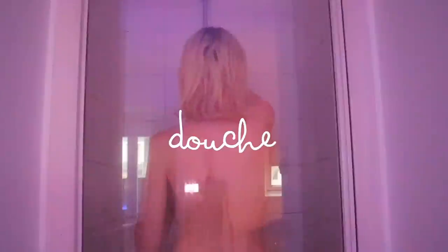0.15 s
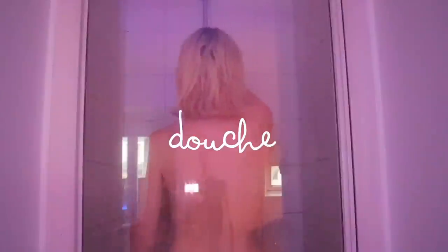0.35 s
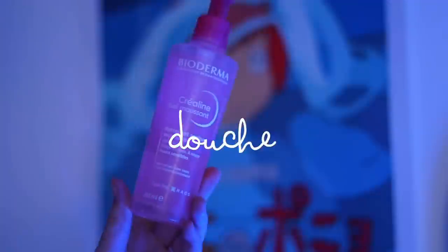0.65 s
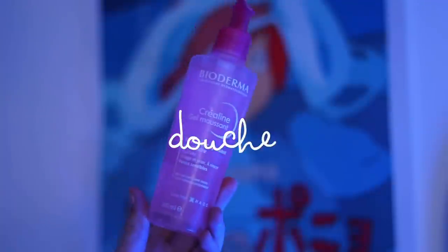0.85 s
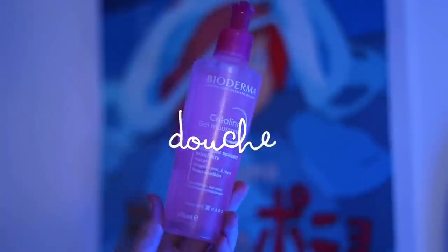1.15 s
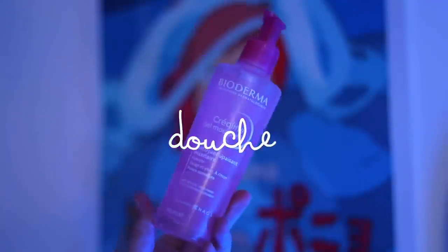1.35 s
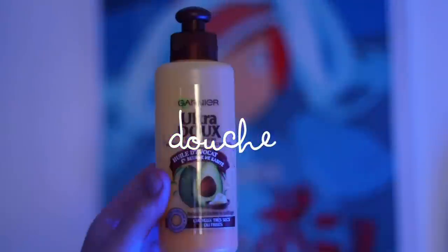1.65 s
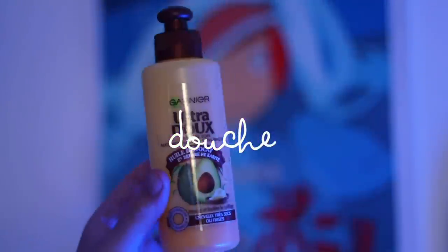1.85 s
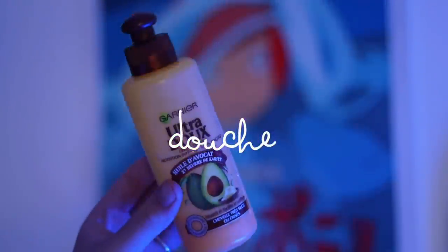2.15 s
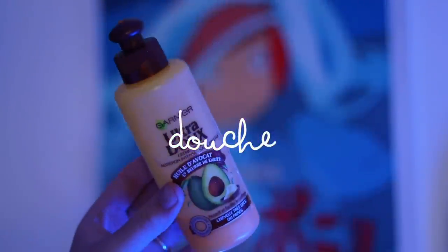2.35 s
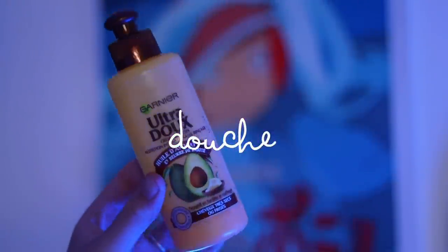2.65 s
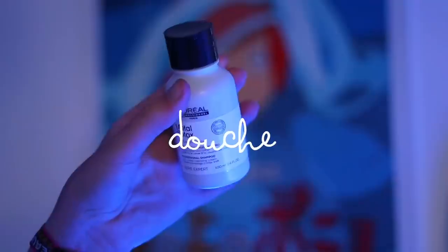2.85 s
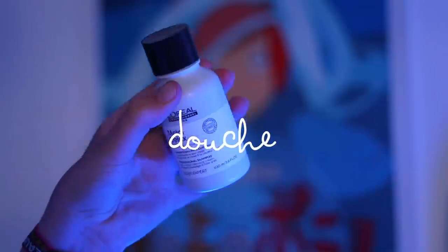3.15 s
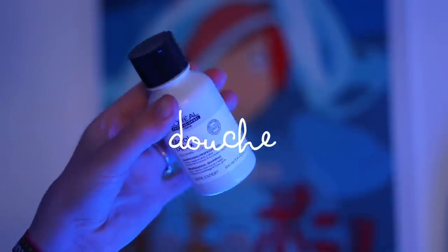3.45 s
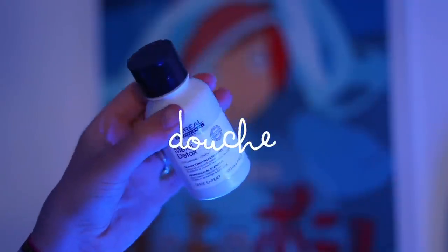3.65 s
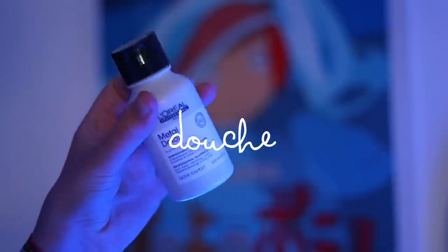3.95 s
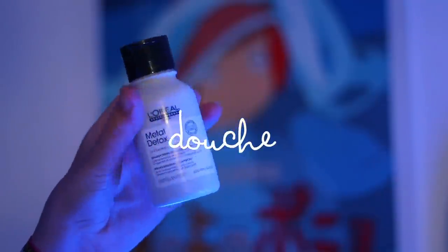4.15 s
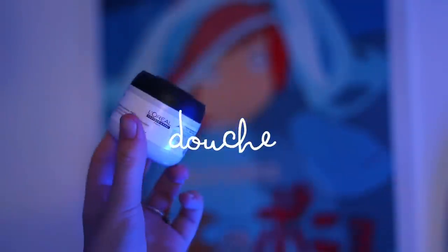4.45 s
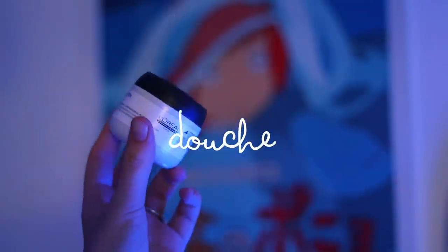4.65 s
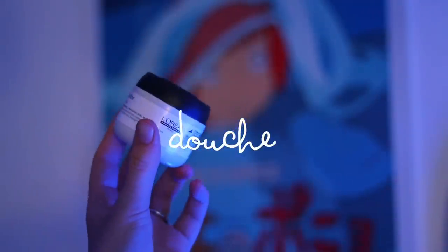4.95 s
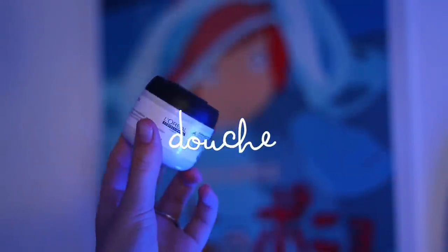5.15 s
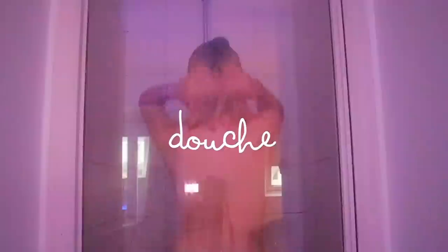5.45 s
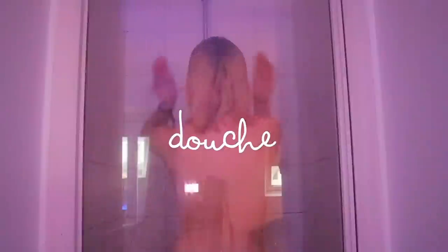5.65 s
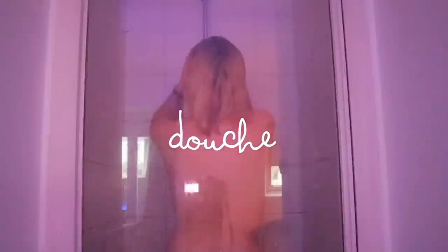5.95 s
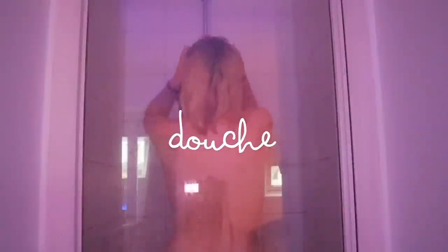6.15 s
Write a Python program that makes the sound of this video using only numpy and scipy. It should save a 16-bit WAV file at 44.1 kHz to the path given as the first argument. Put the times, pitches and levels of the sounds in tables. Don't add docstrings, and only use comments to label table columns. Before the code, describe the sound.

A running shower heard from just outside its cubicle in a small tiled bathroom. Fine, bright spray hisses without stopping while water runs off a body and slaps the tray in uneven bursts, busiest in the first three and a half seconds. Stray drops tick, an occasional bubble plops, and the tray drums softly low down. Wide stereo treble, centred lows, short hard echoes.

```python
import sys
import numpy as np
from scipy import signal
from scipy.fft import rfft, irfft, next_fast_len
from scipy.io import wavfile
from scipy.ndimage import uniform_filter1d

SR = 44100
rng = np.random.default_rng(int(sys.argv[2]) if len(sys.argv) > 2 else 0)


def undo_db(level):
    steps = np.asarray(level, float) / 20
    return 10 ** steps


def int16_out(signal):
    q = np.round(np.clip(np.atleast_2d(signal).T, -1, 1) * 32767)
    wavfile.write(sys.argv[1], SR, q.astype(np.int16))


N = 277389

# start_s, stream_db, coarseness_db, weight_db
STREAM = [(0, -6, -6.5, -2), (.3, -1, -3, -4), (.6, 1, 3, 0), (1.0, -0.5, 1.1, 1), (1.3, -0.5, -2, -1.4),
          (1.75, -4, 5.5, -2.5), (1.96, -0.5, 1, -3), (2.4, -0.5, -2, 1), (2.75, 0, 5, 2.5),
          (3.01, 0, 2.5, 3.5), (3.52, -4, 9.5, 0.5), (3.61, -5, -1, 0.5), (3.8, 1.6, 2, 2.5),
          (4.3, -4.5, -1, 1.5), (4.69, 1, -5, -0.2), (5.01, -1, 0.6, 3), (5.3, 0.5, -4, 0.8),
          (6.29, -0.5, -6, 0)]
# crest_s, swell_db, half_length_s, coarseness_db
GUSHES = [(.14, 8.5, 0.044, .1), (1.193, -0.7, 0.064, 0.5), (1.362, 3.5, 0.029, 6.5),
          (1.464, 6, 0.047, 4.5), (2.182, 6.5, 0.061, 2), (2.507, 7, 0.049, 5), (3.214, 8.5, 0.029, 4),
          (3.35, 5.5, 0.06, -3), (5.477, 3, 0.041, 1.5), (5.613, 0.3, .05, -3), (5.714, 0.8, 0.036, 4),
          (5.802, 0.3, .05, 1), (5.888, 4.5, 0.022, 3), (6.166, 1.5, .04, 2)]
# start_s, level_db
OPENING = [
    (0, -1),
    (.06, -0.5),
    (.074, 0),
    (.09, -2),
    (.2, 2),
]
# pitch_hz, level_db (per Hz)
SPRAY_COLOUR = [(300, -37), (700, -7), (1200, -5), (2100, -3.5), (3000, -3), (5000, -3.5), (8000, -2),
                (11000, 0), (12500, -2.5), (13500, -16), (15200, -12)]
# start_s, level_db, centre_hz, width_octaves
SHEETS = [(0.076, -19, 10800, 1.04), (0.15, -17.5, 6030, 0.74), (0.736, -27, 6540, 0.24),
          (1.146, -17.5, 5240, 1), (1.192, -21, 5700, 0.86), (1.389, -16, 6400, 1.1),
          (1.512, -13, 3230, 0.63), (1.718, -16.5, 4940, 0.55), (1.963, -26.5, 3940, 0.59),
          (2.071, -17, 3760, 0.48), (2.531, -23.5, 4950, 0.38), (2.694, -26.5, 7400, .5),
          (2.834, -18.5, 4100, .5), (2.958, -18.5, 5900, 0.64), (3.11, -15.5, 6680, .65),
          (3.233, -11.5, 8150, 0.88), (3.289, -23.5, 3050, 1.2), (3.343, -20, 4870, .99),
          (3.43, -22, 4800, 0.37), (3.494, -23, 4100, .89), (3.83, -13.5, 5200, 1.05),
          (4.577, -24.5, 4930, 0.29), (4.676, -25.5, 7000, 0.58), (4.737, -20.5, 7700, 0.87),
          (5.085, -23.5, 5700, 0.51), (5.344, -23, 8650, 0.47), (5.876, -18.5, 3700, 0.44),
          (6.018, -23.5, 4730, 0.63)]
# start_s, level_db, centre_hz, mist_db (over the body of the splash)
SPLASHES = [(0.097, -20.5, 6400, 9.5), (0.128, -17.5, 6700, 9), (0.236, -19.5, 8500, 5),
            (2.853, -21.5, 8000, -8), (1.246, -19, 7200, -1), (1.305, -19.5, 5530, 3.5),
            (1.428, -20.5, 4500, 5), (1.685, -26.5, 6200, 4), (1.9, -26, 9100, -1), (2.13, -23, 9100, -2),
            (2.182, -16.5, 6940, -1), (2.197, -20, 4300, 4), (2.26, -23.5, 6900, 6), (2.355, -25, 6900, 9),
            (2.463, -21.5, 5660, 3), (2.5, -23, 4200, 4), (2.631, -21.5, 8400, -2),
            (2.782, -23.5, 5300, -2), (3.143, -18, 4770, 5), (3.815, -26, 5400, 12),
            (3.982, -25.5, 6300, 7), (4.123, -28, 4050, 2), (4.342, -28, 5000, 18), (4.426, -18, 6340, 5.5),
            (4.9, -26.5, 5330, -8), (5.248, -27, 6700, 18), (5.431, -25, 8540, 6), (5.721, -26.5, 5800, 13),
            (6.164, -32, 5650, 10)]
# start_s, level_db
PUFFS = [
    (0.428, -32),
    (.881, -31.5),
    (3.657, -31),
    (4.246, -44),
    (4.293, -33),
    (5.04, -31),
    (5.17, -28),
    (5.38, -30),
    (6.22, -37),
]
# start_s, level_db, pitch_hz, t60_s
PLOPS = [(1.44, -33, 418, 0.088), (2.505, -33, 444, 0.074), (1.975, -22.5, 2990, 0.023),
         (2.76, -28.5, 2000, 0.018), (4.426, -36, 1127, 0.049), (5.01, -36, 1980, .04),
         (5.13, -33, 2450, .03), (5.622, -26.5, 2410, 0.03), (5.709, -30.5, 1800, 0.0066),
         (6.113, -25.5, 2650, 0.021), (6.268, -29, 720, 0.084)]
# pitch_hz, width_hz, level_db
ROOM_MODES = [(24.8, 6.1, -1), (73.7, 10.5, -3), (142.7, 4.1, 3.5), (218.6, 5.9, 0), (235.5, 8, -3),
              (280, 3.7, 0.5), (383.4, 37, -11.5), (427, 20.7, -2), (455, 44, -7), (545.7, 24.3, -2.5),
              (645, 55, -8), (823, 170, -8)]
# start_s, level_db, half_length_s
BOOMS = [(0.143, -51, 0.086), (1.146, -46.5, 0.23), (1.6, -52, 0.14), (2.03, -47, 0.13), (2.68, -50, 0.21),
         (3.024, -46, .1), (3.233, -42, .07), (3.8, -50.5, 0.34), (4.487, -48, 0.066), (4.808, -53, 0.18),
         (5.183, -43.5, 0.24), (5.476, -42, 0.03), (5.713, -36.5, 0.1), (5.954, -40, .05),
         (6.165, -42, 0.046)]
# pitch_hz, t60_s
TILE_ECHO = [(500, 0.12), (1500, 0.36), (3500, 0.24), (9000, 0.26), (13000, 0.2)]
# pitch_hz, side_over_mid_db
SIDE_OVER_MID = [(60, -22), (110, -19.5), (200, -11.5), (380, -12), (690, -6.5), (1280, -3), (2350, 1),
                 (4340, 4), (8000, 5), (14700, 7)]

PATTER_DB, FIZZ_DB, DRUM_DB = -36, -31.5, -42
GUSH_FALL = 1.7
DRUM_GUSH = 0.71
BOOM_REST_DB = -55
SHEET_LANDING_S, SHEET_RISE_S, SHEET_MIST_DB = 0.0036, 0.0022, -16
MIST_DB_PER_OCTAVE = 6.5
SLOWER_PER_DB = 0.01
SPLASH_LANDING_S, SPLASH_RISE_S, SPLASH_OCTAVES = 0.008, 0.0028, 0.88
PUFF_HZ, PUFF_OCTAVES, PUFF_MIST_DB = 8000, 0.7, 5.5


def evened(x):
    return x / np.sqrt(np.mean(x ** 2) + 1e-20)


def read(points, hz):
    f, value = np.transpose(points)
    return np.interp(np.log(hz + 1), np.log(f + 1), value)


def add(mix, start_s, sound):
    part = mix[round(start_s * SR):][:len(sound)]
    part += sound[:len(part)]


def hump(t, crest_s, half_s, fall):
    stretch = np.where(t > crest_s, fall, 1)
    return np.exp(-((t - crest_s) / (half_s * stretch)) ** 2)


def shares(hz):
    return np.array([1 + 0 * hz, undo_db(read(SIDE_OVER_MID, hz))])


def noise(gain, size):
    a, b = rng.standard_normal((gain.shape[2], gain.shape[1], 2, 2)).T
    return signal.istft((a + 1j * b) * gain, nperseg=size, noverlap=size * 3 // 4)[1][:, :N]


def flow(t, layer):
    start_s, *controls = np.transpose(STREAM)
    stream_db, coarse_db, weight_db = (np.interp(t, start_s, c) for c in controls)
    gush_db = 0
    for crest_s, swell_db, half_s, rough_db in GUSHES:
        swell = hump(t, crest_s, half_s, GUSH_FALL)
        gush_db = gush_db + swell_db * swell
        coarse_db = coarse_db + rough_db * swell
    levels = {
        "patter": PATTER_DB + stream_db + gush_db + coarse_db,
        "fizz": FIZZ_DB + stream_db + gush_db,
        "drum": DRUM_DB + weight_db + DRUM_GUSH * gush_db,
    }
    return levels[layer] + np.interp(t, *np.transpose(OPENING))


def spray_db(hz, t):
    upper = np.clip(np.log2(hz / 4000 + 1e-9), 0, 1)[:, None]
    follow = np.clip(np.log2(hz / 700 + 1e-9) / 3.1, 0.35, 1)[:, None]
    patter = flow(t, "patter") + 36
    fizz = flow(t, "fizz") + 32
    return read(SPRAY_COLOUR, hz)[:, None] + follow * ((1 - upper) * patter + upper * fizz)


def spray():
    hz, t = np.fft.rfftfreq(256, 1 / SR), np.arange(N // 64 + 5) * 64 / SR
    patches, flicker = rng.standard_normal((len(t), len(hz), 2)).T
    patches = evened(uniform_filter1d(uniform_filter1d(patches, 6, axis=0), 40, axis=1))
    flicker = evened(uniform_filter1d(uniform_filter1d(flicker, 40, axis=0), 10, axis=1))
    field = undo_db(spray_db(hz, t) + 1.5 * patches + 1.4 * flicker)
    return undo_db(-47) * noise(shares(hz)[:, :, None] * field, size=256)


def slap(level_db, centre_hz, octaves, landing_s, rise_s, mist_db):
    draw = rng.standard_normal(4096)
    t, hz = np.arange(len(draw)) / SR, np.fft.rfftfreq(len(draw), 1 / SR)
    away = np.log2((hz + 1) / centre_hz) / (octaves + 0.15)
    body = np.exp(-abs(away) ** 2.4)
    mist = undo_db(mist_db) * np.exp(-abs(np.log2((hz + 1) / 10500) / 0.28) ** 1.22)
    band = np.hypot(body, mist) + undo_db(-23.5)
    shape = (1 - np.exp(-t / rise_s)) * np.exp(-(t / (1.28 * landing_s)) ** 1.7)
    lumpy = rfft(draw * shape)
    even = lumpy / (uniform_filter1d(abs(lumpy) ** 2, size=9) + 1e-9) ** 0.29
    burst = irfft(even * band) * shape ** 0.2
    return undo_db(level_db + 33) * burst / np.linalg.norm(burst)


def sheets():
    out = np.zeros(N)
    for start_s, level_db, hz, octaves in SHEETS:
        mist_db = SHEET_MIST_DB + MIST_DB_PER_OCTAVE * np.log2(hz / 5500)
        slower = np.exp(SLOWER_PER_DB * (level_db + 9))
        landing_s, rise_s = SHEET_LANDING_S * slower, SHEET_RISE_S * slower
        add(out, start_s, slap(level_db, hz, octaves, landing_s, rise_s, mist_db))
    return out


def splashes():
    out = np.zeros(N)
    for start_s, level_db, hz, mist_db in SPLASHES:
        add(out, start_s, slap(level_db, hz, SPLASH_OCTAVES, SPLASH_LANDING_S, SPLASH_RISE_S, mist_db))
    return out


def puffs():
    out = np.zeros(N)
    for start_s, level_db in PUFFS:
        puff = slap(level_db, PUFF_HZ, PUFF_OCTAVES, SPLASH_LANDING_S, SPLASH_RISE_S, PUFF_MIST_DB)
        add(out, start_s, puff)
    return out


def plop(level_db, hz, t60_s):
    t = np.arange(round(0.15 * SR)) / SR
    fade = undo_db(-60 * t / t60_s) * (1 - np.exp(-t / 0.00015))
    ring = fade * np.sin(2 * np.pi * hz * t * (1 + 2.8 * t))
    return undo_db(level_db + 26) * ring / np.linalg.norm(ring)


def plops():
    out = np.zeros(N)
    for start_s, *bubble in PLOPS:
        add(out, start_s, plop(*bubble))
    return out


def droplets():
    hits = rng.random(N) < 500 / SR
    size = undo_db(2.1 * np.minimum(rng.exponential(1, N), 4)) * hits
    kind, out = rng.integers(0, 24, N), np.zeros(N)
    t = np.arange(300) / SR
    for k, hz in enumerate(np.geomspace(2600, 12000, 24)):
        grain = np.sin(2 * np.pi * hz * t) * (hz * t) * np.exp(-hz * t / 1.3)
        out += undo_db(1.3 * np.log2(hz / 5000)) * signal.oaconvolve(size * (kind == k), grain)[:N]
    return evened(out) * undo_db(flow(np.arange(N) / SR, "fizz") - 7)


def drumming():
    hz, t = np.fft.rfftfreq(4096, 1 / SR), np.arange(N // 1024 + 5) * 1024 / SR
    modes = 0
    for k, (f, width_hz, db) in enumerate(ROOM_MODES):
        modes = modes + (-1) ** k * undo_db(db) / (1 + 2j * (hz - f) / width_hz)
    swells = rng.standard_normal((len(t), len(hz))).T
    swells = evened(uniform_filter1d(uniform_filter1d(swells, 8, axis=0), 6, axis=1))
    colour = (abs(modes) + undo_db(-21.5)) / (1 + (hz / 900) ** 4)
    low = noise(shares(hz)[:, :, None] * colour[:, None] * undo_db(0.64 * swells), size=4096)
    low = low / np.std(low[0])
    house = signal.sosfiltfilt(signal.butter(2, 105, fs=SR, output="sos"), low)
    boom = signal.sosfiltfilt(signal.butter(2, [122, 160], "bandpass", fs=SR, output="sos"), low)
    t = np.arange(N) / SR
    swing = undo_db(BOOM_REST_DB + 9)
    for crest_s, db, half_s in BOOMS:
        swing = swing + undo_db(db + 6.5) * hump(t, crest_s, half_s, 1.36)
    tray = (low - house - boom) * undo_db(flow(t, "drum") - 0.76)
    return tray + boom * swing + house * undo_db(-41.5)


def tile_tails():
    length = SR // 2
    taps = np.zeros((6, length))
    at = np.arange(20, length - 20, 20) + rng.integers(0, 20, (6, (length - 21) // 20))
    np.put_along_axis(taps, at, rng.choice([-1., 1.], at.shape), 1)
    hz, t, z = signal.stft(taps, SR, nperseg=128)
    fade = undo_db(-60 * t / read(TILE_ECHO, hz)[:, None])
    tails = signal.istft(z * fade, SR, nperseg=128)[1]
    onset_s = np.array([0.006] * 3 + [0.0008] * 3)[:, None]
    tails = tails * (1 - np.exp(-(np.arange(tails.shape[1]) / SR / onset_s) ** 2))
    return tails / np.linalg.norm(tails, axis=1)[:, None]


def bathroom(x, wet_db, side_direct_db):
    turn = 2 * np.pi * (2.3 * np.arange(N) / SR + np.arange(3)[:, None] / 3)
    fed = x * np.sqrt(2 / 3) * np.cos(turn)
    wet = signal.oaconvolve(np.tile(fed, (2, 1)), tile_tails(), axes=1)[:, :N]
    wet = wet.reshape(2, 3, N).sum(1)
    both = x * undo_db([[0], [side_direct_db]]) + undo_db([[wet_db - 1.5], [wet_db]]) * wet
    size = next_fast_len(N)
    split = shares(np.fft.rfftfreq(size, 1 / SR))
    split = split / np.linalg.norm(split, axis=0)
    return irfft(rfft(both, size) * split, size)[:, :N]


def thin_out(x, edge_hz, spread_hz, weak_db):
    lead = 1024 - 280
    hz, t, z = signal.stft(np.pad(x, (lead, 0)), SR, "cosine", nperseg=2048)
    bands = z[:1024].reshape(128, 8, -1)
    centre_hz = hz[:1024].reshape(128, 8).mean(1)[:, None]
    power = (abs(bands) ** 2).mean(1)
    treble = power[(centre_hz[:, 0] > 2500) & (centre_hz[:, 0] < 12000)].mean(0)
    touchy_db = 3.3 * np.exp(-((centre_hz - 4400) / 1200) ** 2)
    touchy_db = touchy_db + 1.3 * rng.standard_normal(power.T.shape).T
    weak = power < treble * undo_db(2 * (weak_db + touchy_db))
    weak = weak & (centre_hz > 2600) & (centre_hz < 11800)
    wander = evened(uniform_filter1d(rng.standard_normal(len(t)), size=2))
    wander = wander + 0.8 * evened(np.gradient(np.log(treble + 1e-12)))
    edge = np.round((edge_hz + spread_hz * wander) / 345) * 345
    islands = uniform_filter1d(rng.standard_normal(power.shape), size=3, axis=0)
    islands = evened(uniform_filter1d(islands, size=2, axis=1))
    spared = (islands > 1.1 + (centre_hz - edge_hz) / 2500) & (centre_hz < 15300)
    keep = ((centre_hz < edge) | spared) & ~weak
    mask = np.vstack([np.repeat(keep, 8, axis=0), keep[-1:]])
    return signal.istft(z * mask, SR, "cosine", nperseg=2048)[1][lead:lead + N]


def scene():
    impacts = sheets() + splashes() + puffs() + plops() + droplets()
    tiled = undo_db(-3) * bathroom(impacts, wet_db=2.5, side_direct_db=-27)
    mid, side = spray() + tiled + drumming()
    return np.array([mid + side, mid - side])


def low_pass(x):
    return signal.sosfilt(signal.butter(12, 15800, fs=SR, output="sos"), x)


def record(dry):
    left, right = 1.284 * np.tanh(dry / 1.323)
    mid = thin_out((left + right) / 2, edge_hz=12100, spread_hz=330, weak_db=-8.2)
    side = thin_out((left - right) / 2, edge_hz=14800, spread_hz=400, weak_db=-17)
    return low_pass(np.array([mid + side, mid - side]))


dry = scene()
out = record(dry)
int16_out(out)
```